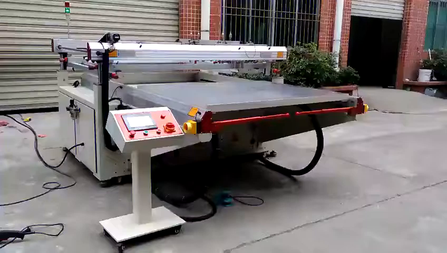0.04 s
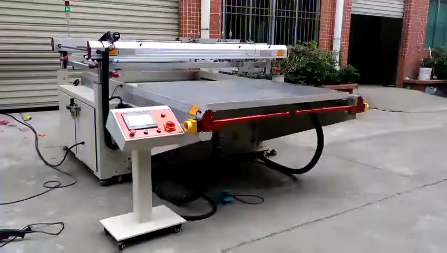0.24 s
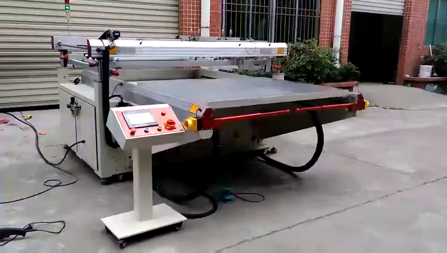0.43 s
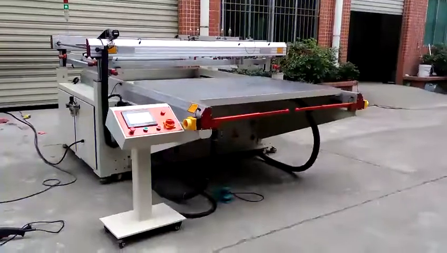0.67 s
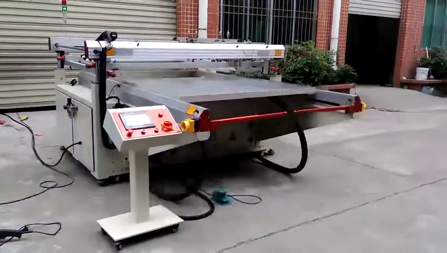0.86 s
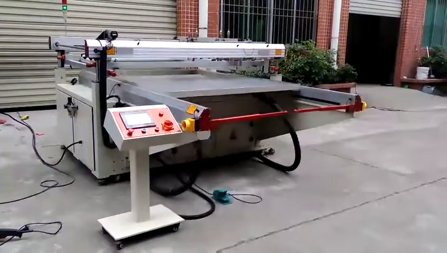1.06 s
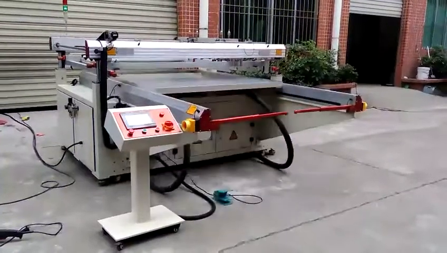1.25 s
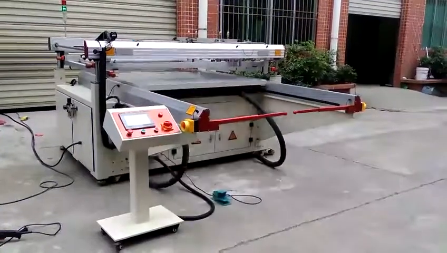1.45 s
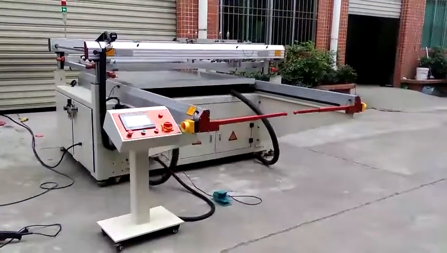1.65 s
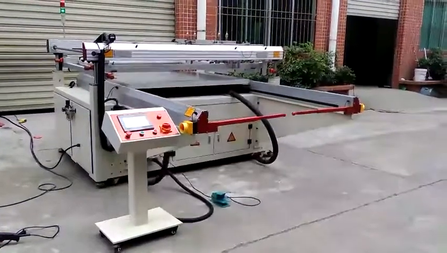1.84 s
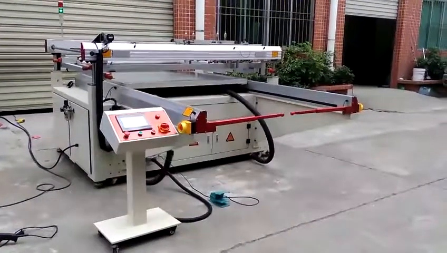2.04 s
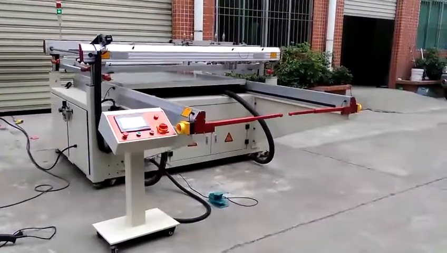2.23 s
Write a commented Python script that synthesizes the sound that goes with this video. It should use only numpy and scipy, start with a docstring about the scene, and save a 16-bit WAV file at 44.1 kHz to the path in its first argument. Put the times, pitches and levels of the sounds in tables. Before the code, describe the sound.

A screen printing machine's motor hums, cutting in and out with low thumps for the first 0.4 seconds. Its table then rolls along rails with thin whistles and a rising belt hum, swelling by 0.9 seconds. The frame booms and rattles from about 1 to 1.5 seconds. The table slows, rattles around 1.7 and clunks against a metal stop at 2 seconds, leaving a soft idle hum.

```python
"""A screen printing machine hums in a yard. At first the sound cuts in and out, with low thumps.
The motor rumbles and whines, and the table slides off along its rails: bearings roll, the toothed belt
hums higher as it speeds up, and a guide whistles. Near full speed the table rattles and the frame booms.
Then the table brakes, rattles again and clunks against its metal stop, leaving only the idle hum."""
import sys
import numpy as np
from scipy import signal
from scipy.fft import rfft, irfft
from scipy.io import wavfile

SR = 44100
rng = np.random.default_rng(int(sys.argv[2]) if len(sys.argv) > 2 else 0)


def persist_wave(psi):
    """Save psi, clipped to +-1, as 16-bit WAV."""
    counts = np.round(np.clip(psi, -1, 1) * 32767).astype(np.int16)
    wavfile.write(sys.argv[1], SR, np.atleast_2d(counts).T)


N = 101429
T = np.arange(N) / SR
HZ = np.maximum(np.arange(N // 2 + 1) * SR / N, 1)


def amp(db):
    """Turn decibels into a gain."""
    return 10 ** (np.asarray(db) / 20)

def unit(x):
    """Scale a sound to an average (rms) level of 1."""
    return x / np.sqrt(np.mean(x ** 2))

def noise():
    """Plain, even hiss."""
    return rng.standard_normal(N)

def curve(rows):
    """Join (time, value) points with straight lines."""
    return np.interp(T, *np.array(rows).T)

def wander(rate_hz):
    """A smooth random wobble, about 1 in size."""
    return unit(irfft(rfft(noise()) * np.exp(-(HZ / rate_hz) ** 2), N))

def phase_of(hz):
    """The running angle of a wave whose pitch changes."""
    return 2 * np.pi * np.cumsum(hz) / SR

def colour(x, points):
    """Shape a sound's bass and treble with (pitch, level) points."""
    hz, db = np.array(points).T
    return unit(irfft(rfft(x) * amp(np.interp(np.log(HZ), np.log(hz), db)), N))

def resonance(x, hz, width):
    """Keep the band around one pitch, as a ringing part does."""
    return unit(irfft(rfft(x) / (1 + 1j * (HZ / hz - hz / HZ) * hz / width / 2) ** 2, N))

def swell(peak_s, half_s):
    """A smooth rise and fall around one moment."""
    return 1 / (1 + ((T - peak_s) / half_s) ** 2 / 4) ** 4

def singing(peak_s, half_s, hz, width_hz, db):
    """A band of noise that swells and fades."""
    return amp(db) * swell(peak_s, half_s) * resonance(noise(), hz, width_hz)

def decay(start, fade_s):
    """Jump up at a blow, then fall by 60 dB in fade_s."""
    return (T > start) * np.exp(-np.log(1000) * np.maximum(T - start, 0) / fade_s)

def ring(start, hz, fade_s, waver=0):
    """A tone that starts at a blow and dies away."""
    return np.sin(2 * np.pi * hz * (T - start) + waver) * decay(start, fade_s)

def panels(x, fade_s=.14, above_hz=600):
    """Steel panels add a short, dense ring to the middle and treble."""
    tail = noise() * np.exp(-np.log(1000) * T / fade_s)
    response = rfft(tail / np.sqrt(np.sum(tail ** 2)))
    share = amp(-1) * HZ ** 2 / (HZ ** 2 + above_hz ** 2)
    return irfft(rfft(x) * (1 + share * response) / np.hypot(1, share), N)


# Gaps in the sound: start_s, end_s, fade_out_s
GAPS = [(-.1, .1425, .002), (.21, .305, .003), (.317, .421, .0012)]

def dropouts(x, return_s=.0021):
    """The sound falls almost silent in each gap, then snaps back."""
    muted = 0
    for start, end, fade_out in GAPS:
        leaving = 1 - np.exp(-np.maximum(T - start, 0) / fade_out)
        muted += leaving * np.clip((end - T) / return_s + .5, 0, 1)
    return x * (1 - muted + muted * amp(-67))

# Tones of the idle hum: pitch_hz, level_db
IDLE_TONES = [(301.5, -58.5), (398.4, -69.5), (576.0, -65.5), (963.6, -72.5)]
# Shape of the idle noise: pitch_hz, relative_db
IDLE_SHAPE = [(30, -25), (90, -0.5), (150, -4.5), (300, -3), (500, -14), (1000, -16.5), (1500, -28),
              (3000, -35.5), (4100, -25.5), (4600, -32), (5200, -33.5), (6000, -25), (6500, -39.5),
              (7400, -41.5)]

def idle():
    """The machine hums and hisses softly the whole time."""
    hum = sum(amp(db + 2 * wander(8.2)) * np.sin(2 * np.pi * hz * T) for hz, db in IDLE_TONES)
    return hum + amp(-52.5) * colour(panels(noise()), IDLE_SHAPE)

# How hard the motor works: time_s, gain_db
MOTOR_EFFORT = [(.14, 2), (.21, -4.5), (.43, -2), (.65, 3), (1.2, 2.5), (1.75, 4), (1.98, 1), (2.06, -7.5),
                (2.15, -15.5), (2.3, -23.5)]
# Shape of its rumble: pitch_hz, relative_db
MOTOR_SHAPE = [(18, -52), (30, -19.5), (87, -5.5), (117, -11.5), (157, 2.5), (300, -2), (444, -9.5),
               (656, -9), (719, -11), (845, -11.5), (1280, -17), (1980, -22.5), (2550, -24.5),
               (3610, -23.5), (4400, -30), (4800, -33.5), (5210, -22.5), (7360, -40), (9570, -73),
               (16200, -120)]
# Its whine, before the effort is applied: pitch_hz, width_hz, level_db
MOTOR_WHINE = [(3284, 22, -69), (5953, 8, -73)]
# Loudness of its thin whistle: time_s, level_db
MOTOR_WHISTLE = [(.4, -74), (.65, -63), (1.2, -61), (1.75, -61.5), (1.98, -67), (2.15, -90)]

def motor(whistle_hz=5753):
    """The motor engages with a low swell, then rumbles and whines until the table stops."""
    rumble = amp(-40.5) * colour(panels(noise()), MOTOR_SHAPE)
    whine = sum(amp(db) * resonance(noise(), hz, width) for hz, width, db in MOTOR_WHINE)
    whistle_gain = amp(curve(MOTOR_WHISTLE) + 2 * wander(7.8))
    whistle = whistle_gain * np.sqrt(2) * np.sin(2 * np.pi * whistle_hz * T)
    engage = singing(peak_s=.1, half_s=.4, hz=276, width_hz=169.5, db=-43.5)
    return engage + (rumble + whine) * amp(curve(MOTOR_EFFORT)) + whistle

# Low thumps: start_s, pitch_hz, level_db, fade_s
LOW_THUMPS = [(0.3051, 150, -27.5, .03), (0.3125, 52.6, -27.5, 0.085), (0.429, 62.6, -39, 0.13)]

def thumps():
    """Short, deep tones thump as the sound comes back."""
    return sum(amp(db) * ring(start, hz, fade) for start, hz, db, fade in LOW_THUMPS)

# Whistles of a guide: peak_s, half_length_s, pitch_hz, glide_hz_per_s, level_db
GUIDE_WHISTLES = [(.48, .055, 5115, 0, -51), (.66, .1, 5122, 0, -56), (1.62, .12, 4100, 250, -60),
                  (1.87, .12, 4158, 0, -57.5)]

def guide_whistle():
    """A guide whistles unsteadily as the table starts and brakes."""
    out = np.zeros(N)
    for peak, half, hz, glide, db in GUIDE_WHISTLES:
        phase = phase_of(hz + glide * (T - peak)) + .45 * wander(30)
        out += amp(db + 2 * wander(27)) * swell(peak, half) * np.sin(phase)
    return out

# Squeals of the bearings: peak_s, half_length_s, pitch_hz, width_hz, level_db
BEARING_SQUEALS = [(.67, .13, 5272, 20, -63), (.52, .12, 5432, 20, -68), (.68, .15, 1960, 130, -54),
                   (1.66, .2, 5930, 300, -61), (1.88, .08, 5135, 40, -64)]

def bearing_squeal():
    """The bearings sing as the table starts and as it slows."""
    return sum(singing(*row) for row in BEARING_SQUEALS)

def ball_ticks(per_s=4000, spread_db=1.5):
    """Bearing balls make thousands of tiny contacts with a rail."""
    hits = rng.random(N) < per_s / SR
    return hits * noise() * amp(spread_db * noise())

# Shape of the rolling roar: pitch_hz, relative_db
ROAR_SHAPE = [(24, -46), (40, -26.5), (65, -22), (102, -8.5), (150, -5.5), (190, -4.5), (250, -9),
              (298, -5.5), (422, -10), (537, -7.5), (639, -7), (849, -7.5), (1060, -10.5), (1260, -14.5),
              (1430, -17), (1940, -19.5), (2940, -22), (3500, -24.5), (4460, -29.5), (5920, -30.5),
              (7360, -58)]
# Ringing of frame and rails: pitch_hz, width_hz, full_speed_db, speed_power
FRAME_RINGS = [(153, 30, -49.5, 1.4), (295.8, 11, -47.5, 1.3), (399.7, 16, -46, 1.1), (554, 38, -43, 2.6),
               (581, 15, -45, 2.7), (747, 28, -47.5, 0.77), (851.3, 17, -47, 1.3), (1029, 5.6, -57.5, 1.1),
               (1180, 15, -52.5, 6.8), (1867, 110, -57.5, 0.44), (2230, 16, -64, 0.58),
               (3420, 400, -52.5, 2.8)]

def rolling(speed):
    """The bearings roar and make the frame ring, louder with speed."""
    roar = amp(-36.5) * speed ** 1.6 * colour(panels(ball_ticks()), ROAR_SHAPE)
    frame = sum(amp(db) * speed ** power * resonance(ball_ticks(), hz, width)
                for hz, width, db, power in FRAME_RINGS)
    # The rails' hiss stays very faint: its peak lies long after the sound ends.
    hiss = panels(singing(peak_s=5.5, half_s=.55, hz=5895, width_hz=478, db=-41.5))
    flutter = amp(.2 * wander(45))
    return (roar + frame) * flutter + hiss * amp(curve(MOTOR_EFFORT))

# Tones of the belt: multiple_of_tooth_rate, relative_db
BELT_TONES = [(1, 7), (2, 5), (3, -9.5)]

def belt(speed, full_speed_hz=195.2, wobble=.024):
    """The belt's teeth hum at a pitch that follows the speed."""
    phase = phase_of(full_speed_hz * speed * (1 + wobble * wander(57)))
    hum = sum(amp(db + 2 * wander(22)) * np.sin(multiple * phase) for multiple, db in BELT_TONES)
    return amp(-50) * speed * hum

# Middle of the rails' whirr: time_s, pitch_hz
WHIRR_PATH = [(.6, 3400), (1.35, 3380), (1.55, 3520), (1.7, 3740), (1.82, 4130), (2.0, 4170)]

def rail_whirr(speed, width_hz=810):
    """The rails whirr in a band of noise that climbs as the table brakes."""
    phase = phase_of(curve(WHIRR_PATH))
    whirr = wander(width_hz / 2) * np.sin(phase) + wander(width_hz / 2) * np.cos(phase)
    return amp(-49.5) * speed ** 1.3 * whirr

# Swells of the panels: peak_s, half_length_s, pitch_hz, width_hz, level_db
PANEL_SWELLS = [(0.885, 0.12, 299.4, 23, -38), (0.878, 0.12, 917, 170, -41.5), (1.755, 0.082, 309, 17, -39),
                (1.6, .09, 152, 25, -44)]

def panel_drone():
    """Panels drone briefly on the way up to full speed and on the way down."""
    return sum(singing(*row) for row in PANEL_SWELLS)

# Loose knocks: start_s, level_db
LOOSE_KNOCKS = [(1.035, -30), (1.325, -30), (1.674, -32.5), (1.701, -30), (1.742, -33), (1.764, -33)]
# What each knock rings with: pitch_hz, width_hz, relative_db
KNOCK_BANDS = [(576, 76, -12), (694, 74, -6), (800, 74, -11)]

def rattle():
    """The table knocks on its rails, most often as it brakes."""
    body = sum(amp(db) * resonance(noise(), hz, width) for hz, width, db in KNOCK_BANDS)
    return body * sum(amp(db) * decay(start, fade_s=.1) for start, db in LOOSE_KNOCKS)

# Surges of the boom: peak_s, level_db, half_length_s
BOOM_SURGES = [(1.135, -38, .03), (1.25, -36.5, .17), (1.248, -31, .022), (1.345, -27.5, .017),
               (1.431, -25, .014), (1.49, -39, .03)]

def frame_boom(pitch_hz=189, waver=.015):
    """Near full speed the belt shakes the frame, and its low note booms in surges."""
    note = np.sin(phase_of(pitch_hz * (1 + waver * wander(13))))
    return note * sum(amp(db) * swell(peak, half) for peak, db, half in BOOM_SURGES)

# Hits on the stop: start_s, thud_db, metal_db
STOP_HITS = [(1.9706, -28.5, -42.5), (1.982, -44, -37.5), (1.996, -49, -42), (2.013, -52, -47.5),
             (2.029, -46, -52)]
# Tones of the thud: pitch_hz, relative_db, fade_s
THUD_TONES = [(211, -9, 0.25), (580, -21, .08), (690, -2.5, 0.081), (798, -2, 0.061)]
# Tones of the metal stop: pitch_hz, relative_db, fade_s
METAL_TONES = [(1765, -10, 0.11), (1786, -4.5, 0.13), (1829, -1, 0.12), (1900, -13.5, 0.42),
               (2707, -10, 0.2), (3040, -7.5, 0.091), (3170, -17, 0.13), (4120, -18.5, 0.58),
               (4965, -4.5, 0.12), (5070, -3.5, .09), (5240, -17, 0.08), (5460, -24, 0.1),
               (6060, -16, 0.32)]
# Shape of the crack: pitch_hz, relative_db
CRACK_SHAPE = [(100, 11.5), (750, 12), (1200, -14.5), (3000, -1),
               (4500, -6), (5200, .5), (6200, -4.5), (7400, -13)]

def clunk(crack_s=.042):
    """The table hits its stop with a crack and a thud, then rattles against the metal."""
    out = np.zeros(N)
    for hz, db, fade in THUD_TONES:
        out += sum(amp(thud_db + db) * ring(start, hz, fade) for start, thud_db, _ in STOP_HITS)
    for hz, db, fade in METAL_TONES:
        chatter = .7 * wander(90)  # the chattering contact roughens the ring
        for start, _, metal_db in STOP_HITS:
            pitch = hz * (1 + .006 * rng.standard_normal())
            out += amp(metal_db + db) * ring(start, pitch, fade, chatter)
    age = T - STOP_HITS[0][0]
    crack = colour(noise(), CRACK_SHAPE) * (age > 0) * np.exp(-np.abs(age) / crack_s)
    return out + amp(-35.5) * crack

# The table's trip: time_s, share_of_full_speed
TABLE_SPEED = [(0, .1), (.43, 0.11), (.6, 0.3), (.75, 0.5), (.86, 0.8), (1.0, 0.76), (1.15, 0.99),
               (1.3, 0.97), (1.44, 0.93), (1.56, 0.83), (1.7, 0.72), (1.82, 0.49), (1.95, 0.44),
               (2.05, 0.0094), (2.3, 0.0064)]

def scene():
    """The whole machine in one channel, as the table makes one trip."""
    speed = curve(TABLE_SPEED)
    bearings = rolling(speed) + panel_drone() + bearing_squeal()
    drive = belt(speed) + frame_boom() + motor()
    guides = rail_whirr(speed) + guide_whistle()
    return (bearings + drive + guides + rattle() + clunk() + idle())[None]

def record(dry):
    """Add the early gaps and thumps, then cut the deepest bass and the highest treble."""
    low_cut = signal.butter(2, 33, "high", fs=SR, output="sos")
    high_cut = signal.ellip(12, .2, 80, 7500, fs=SR, output="sos")
    out = dropouts(dry) + thumps()
    return signal.sosfilt(high_cut, signal.sosfilt(low_cut, out))


dry = scene()
out = record(dry)
persist_wave(out)
```